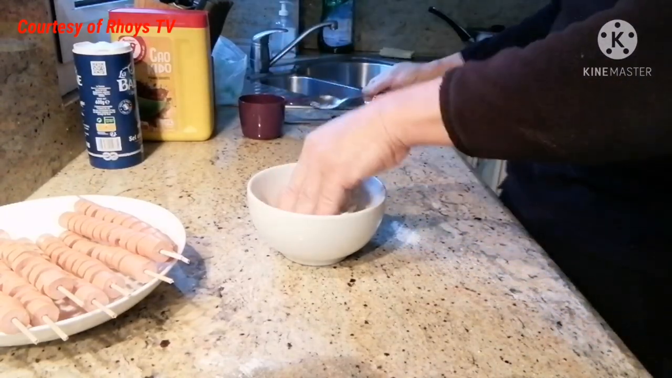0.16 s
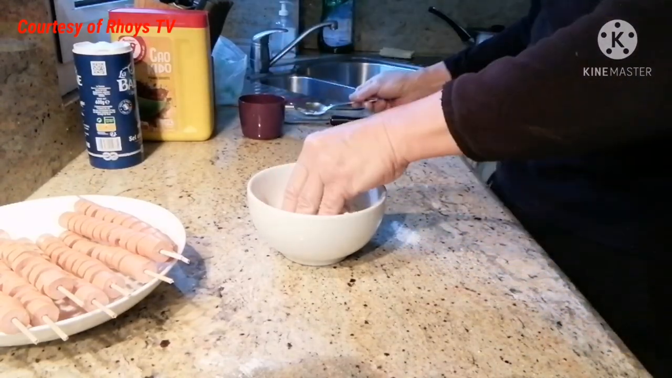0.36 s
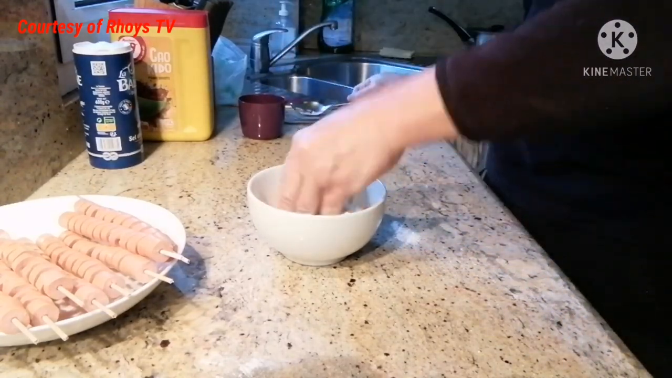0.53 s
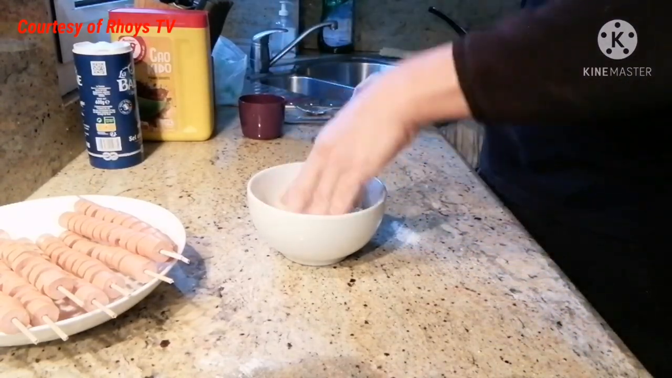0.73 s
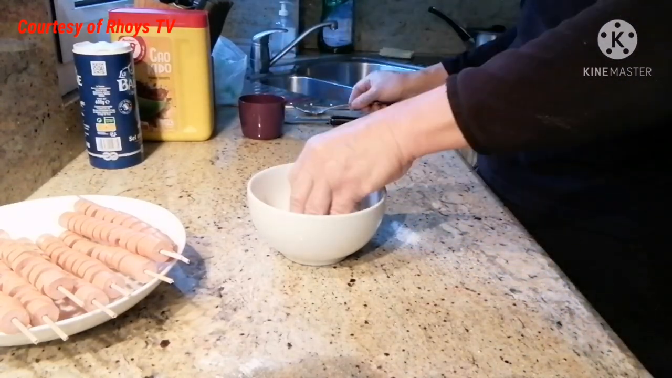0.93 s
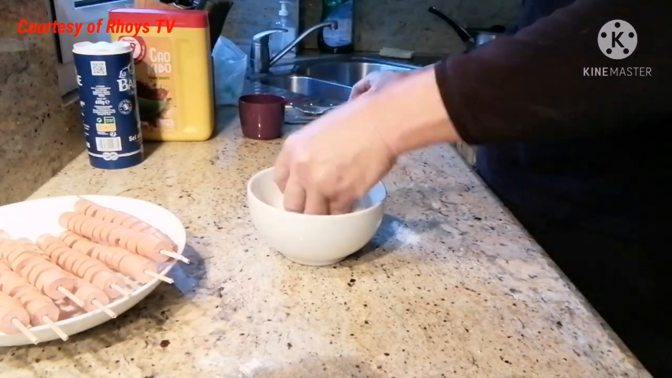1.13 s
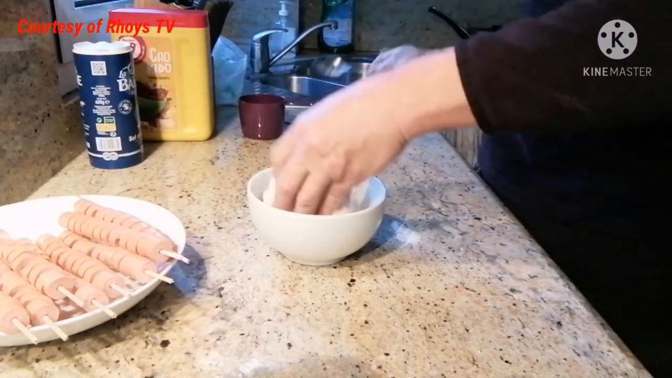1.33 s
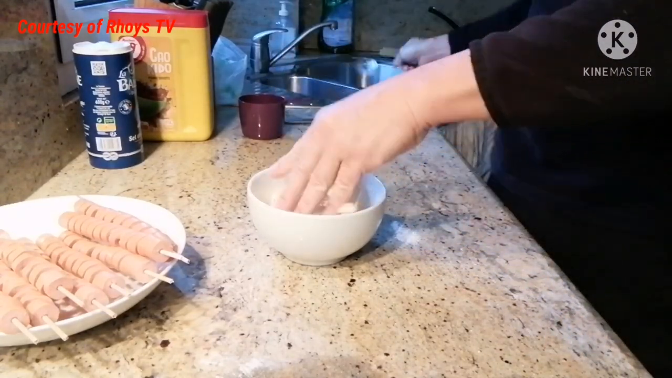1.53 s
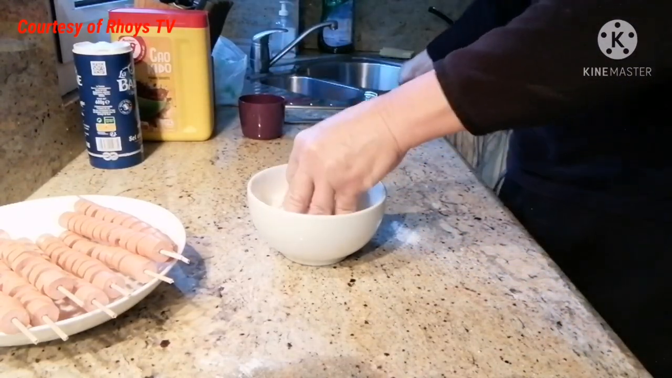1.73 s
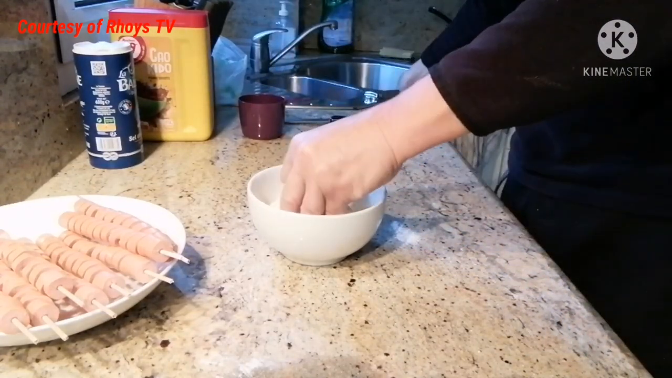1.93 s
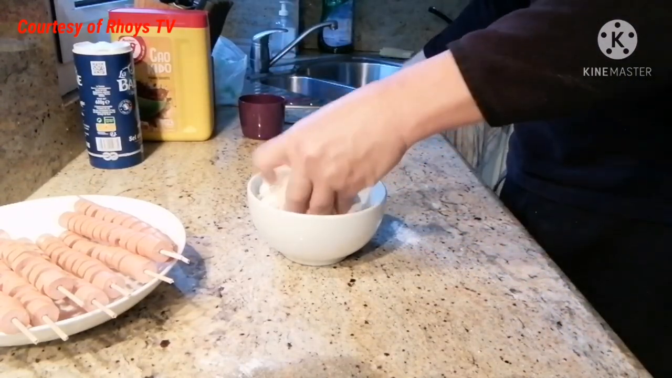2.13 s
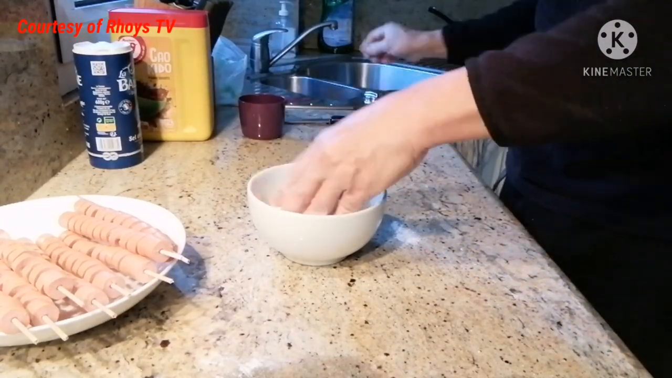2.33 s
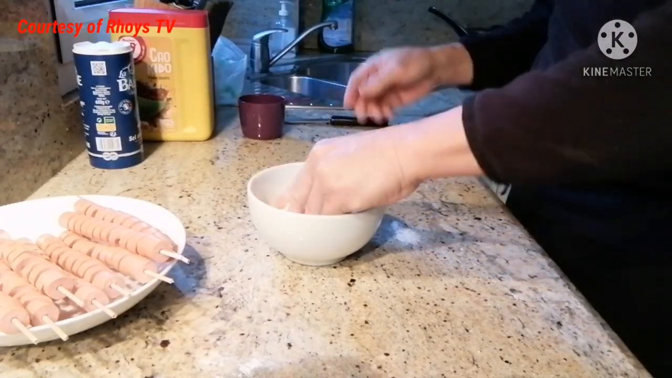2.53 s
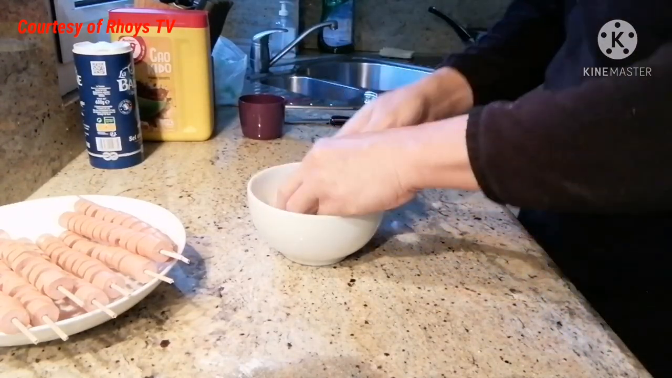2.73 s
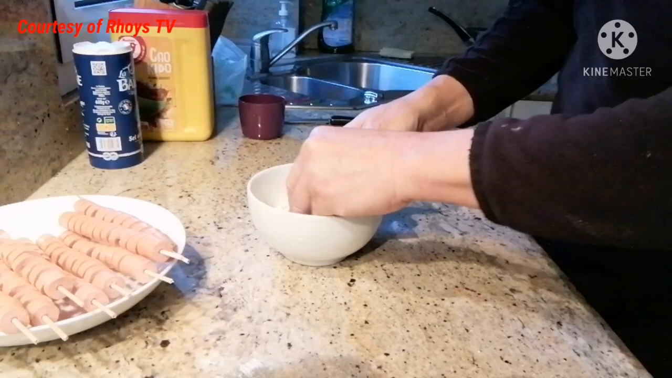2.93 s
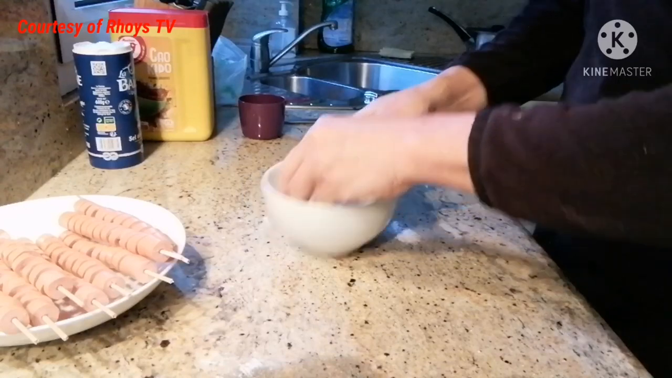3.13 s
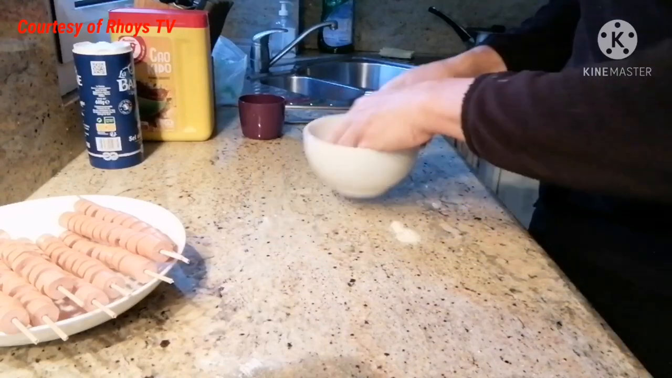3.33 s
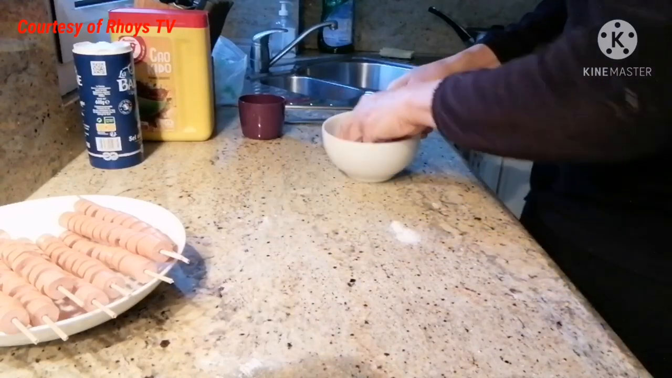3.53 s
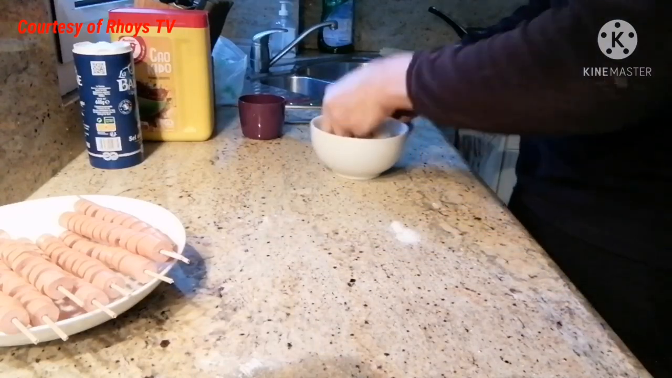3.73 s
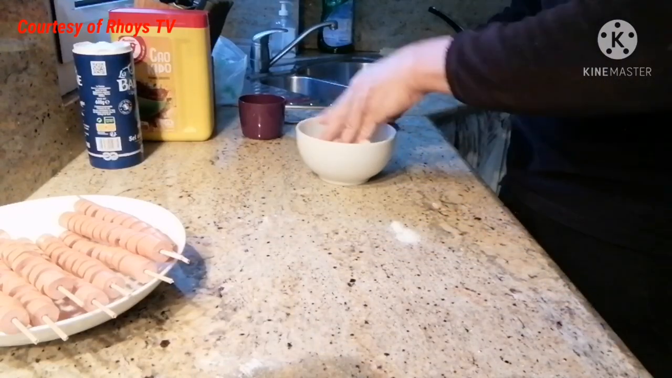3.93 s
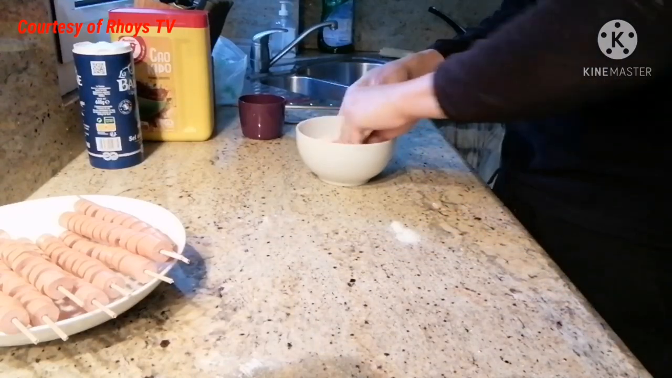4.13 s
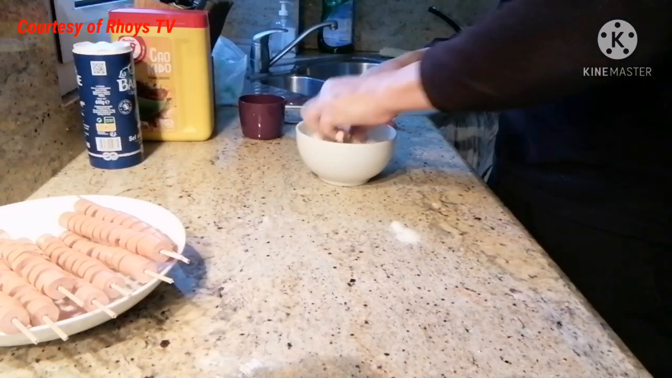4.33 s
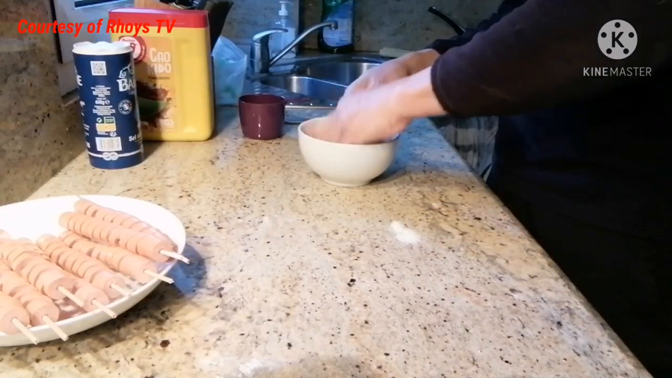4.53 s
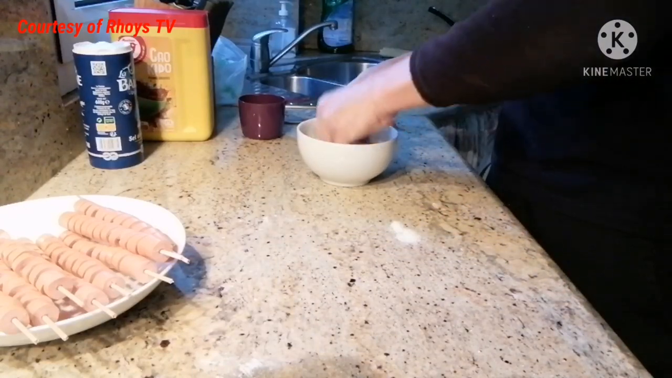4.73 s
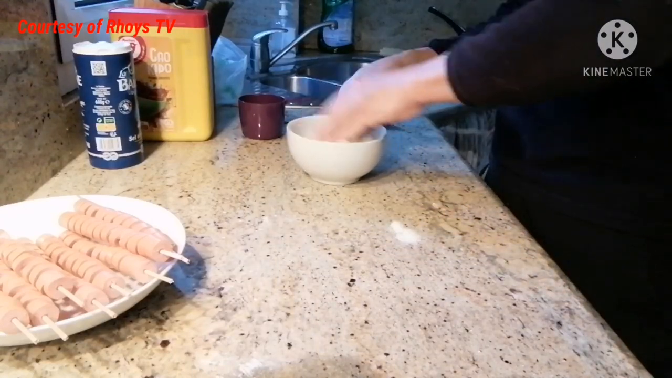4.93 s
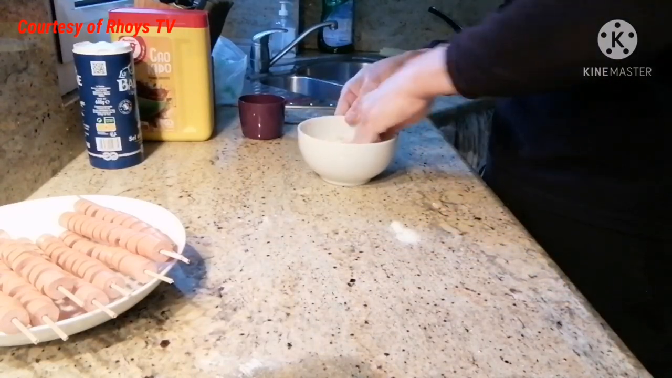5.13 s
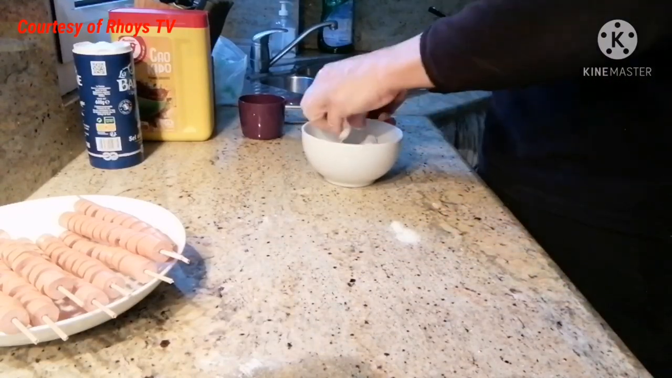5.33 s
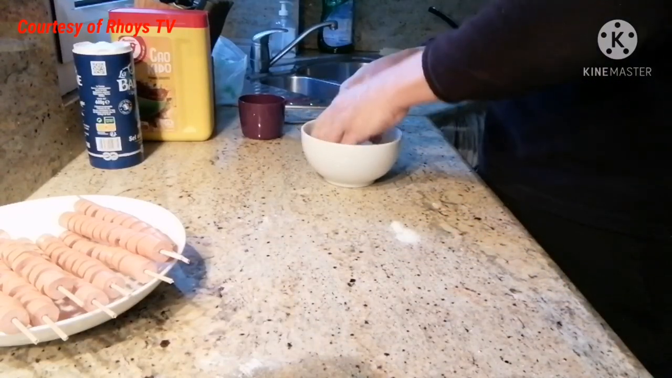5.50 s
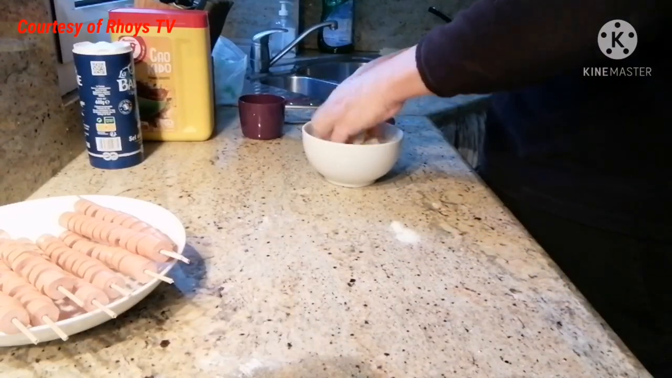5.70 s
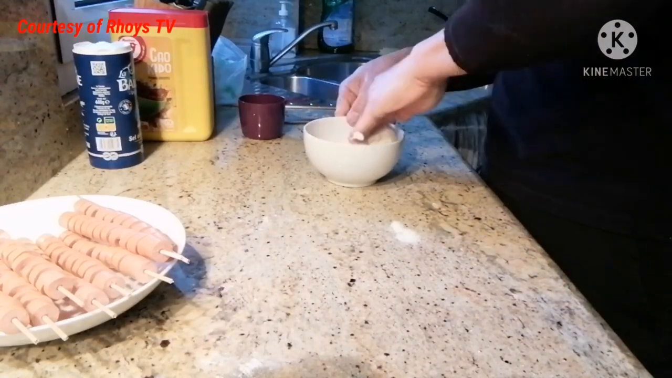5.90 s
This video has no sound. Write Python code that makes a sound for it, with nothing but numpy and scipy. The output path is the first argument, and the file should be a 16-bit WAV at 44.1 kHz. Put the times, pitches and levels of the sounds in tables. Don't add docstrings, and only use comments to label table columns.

```python
import sys
import numpy as np
from scipy import signal
from scipy.fft import rfft, irfft
from scipy.io import wavfile
from scipy.ndimage import uniform_filter1d

SR = 44100
rng = np.random.default_rng(int(sys.argv[2]) if len(sys.argv) > 2 else 0)


def amplitude_ratio(level_db):
    exponent = np.asarray(level_db, float) / 20
    return 10 ** exponent


def bounce(signal):
    frames = np.transpose(np.atleast_2d(signal))
    limited = np.clip(frames, -1, 1)
    pcm = np.round(limited * 32767).astype(np.int16)
    wavfile.write(sys.argv[1], SR, pcm)


N = 262836
T = np.arange(N) / SR


def evened(x):
    return x / np.sqrt(np.mean(x ** 2) + 1e-20)


def read(points, hz, column=1):
    table = np.transpose(points)
    return np.interp(np.log(hz + 1), np.log(table[0] + 1), table[column])


def curve(rows, column=1):
    table = np.transpose(rows)
    return np.interp(T, table[0], table[column])


def add(mix, s, sound):
    part = mix[round(s * SR):][:len(sound)]
    part += sound[:len(part)]


def coloured(points, size):
    hz = np.fft.rfftfreq(size, 1 / SR)
    return evened(irfft(rfft(rng.standard_normal(size)) * amplitude_ratio(read(points, hz)), size))


def onset(t, rise_s):
    return 1 - np.exp(-t / rise_s)


def ring(modes, scatter, rise_s):
    hz, db, t60 = np.transpose(modes)[:, :, None]
    t = np.arange(round(t60.max() * SR)) / SR
    luck = scatter * rng.standard_normal((len(modes), 2))
    level = amplitude_ratio(db + 4 * luck[:, :1] - 60 * t / t60)
    sines = level * np.sin(2 * np.pi * hz * t + luck[:, 1:])
    return sines.sum(0) * onset(t, rise_s)


def band(x, hz, width):
    return signal.lfilter(*signal.iirpeak(hz, hz / width, SR), x)


# (frequency [Hz], correlation)
LIKENESS = [(60, 0.95), (180, 0.94), (550, 0.17), (1650, -0.068), (4970, -0.052), (15000, 0.0022)]


def paired(a, b, likeness):
    return np.array([a, likeness * a + np.sqrt(1 - likeness ** 2) * b])


# (frequency [Hz], density [dB per Hz])
HISS = [(30, -26), (60, -39), (85, -7), (130, -11), (250, -18.5), (430, -15), (550, -20), (800, -12),
        (1100, -22), (1500, -21.5), (2000, -18.5), (3300, -26.5), (7000, -27.5), (16000, -47)]
# (frequency [Hz], width [Hz], level [dB])
CABINET = [(102.5, 5, -74.5), (136.9, 17.5, -74), (629.2, 15, -71.5), (692.2, 13, -69.5), (861.7, 39, -70),
           (1919, 160, -72), (2472, 210, -71), (5260, 440, -77), (6880, 1300, -71)]
# (time [s], whine level [dB])
WHINE = [(0, -82), (2, -74.5), (2.5, -75.5), (3.1, -69.5), (3.6, -76.5), (3.9, -80), (5.96, -78.5)]


def fridge():
    hiss_db, hum_db, whine_hz, mains_hz = -58.5, -61, 1766, 49.7
    pair = np.array([amplitude_ratio(hiss_db) * coloured(HISS, N) for _ in "LR"])
    for hz, width, db in CABINET:
        panel = band(band(rng.standard_normal((2, N)), hz, width), hz, width)
        pair += amplitude_ratio(db) * evened(panel)
    likeness = np.clip(read(LIKENESS, np.fft.rfftfreq(N, 1 / SR)), -1, 1)
    pair = irfft(paired(*rfft(pair), likeness), N)
    flicker = amplitude_ratio(0.75 * evened(uniform_filter1d(rng.standard_normal(N), 2500)))
    waver = amplitude_ratio(1.2 * evened(band(rng.standard_normal(N), 5, 8)))
    whine = amplitude_ratio(curve(WHINE) + 9.5) * waver * np.sin(2 * np.pi * whine_hz * T)
    wobble = evened(band(band(rng.standard_normal(N), 49.5, 8), 49.5, 8))
    hum = amplitude_ratio(hum_db) * evened(np.sin(2 * np.pi * mains_hz * T) + 0.067 * wobble)
    return pair * flicker + whine, hum


# (frequency [Hz], density [dB per Hz])
RATTLE = [(100, -55), (200, -23), (400, -2), (520, -22.5), (900, -15), (1500, -20), (2050, -19),
          (2800, -17), (5500, -17), (7200, -13), (10000, -20.5), (16500, -28.5)]
# (time [s], rattle [dB], basin boom [dB], basin pitch [Hz], brightness [dB/octave])
CLATTER = [
    (2.081, -27.5, -33, 348, 2.5),
    (2.124, -39, -37, 287, -3.5),
    (2.241, -42.5, -42, 346, -0.5),
    (2.273, -24.5, -51, 412, -0.5),
    (2.325, -25, -35, 387, 1),
    (2.339, -55, -32.5, 294.5, -8),
    (2.388, -29.5, -32, 408, 0.5),
    (2.435, -35.5, -39.5, 396, 0),
    (2.448, -51, -38.5, 300, 2),
]
# (frequency [Hz], level [dB], t60 [s])
PAN = [(1093, -7, 0.17), (1480, -10.5, 0.25), (6000, 3.5, 0.11)]
PLATE = [(190, -14, 0.24), (597, -11, 0.27), (914, -9, 0.092), (1307, -10, 0.31), (2920, -22, 0.32),
         (5280, -7.5, 0.05), (6420, 3.5, 0.03)]
SPOONS = [(1740, -8, 0.062), (1950, -14, 0.11), (4460, 3, 0.046), (7359, -2, 0.14), (8530, -12, 0.31)]
GLASS = [(1005, 0, 1.2), (2153, -5, .45)]
DRIP = [(2950, -10.5, .1), (5100, -9, 0.089), (7800, -7.5, 0.092)]
# (time [s], level [dB], modes of the object)
STRIKES = [
    (2.084, -39, PAN),
    (2.13, -48.5, [(864, -1.5, 0.23)]),
    (2.276, -23, PLATE),
    (2.329, -28, SPOONS),
    (2.425, -48.5, GLASS),
    (.845, -51.5, DRIP),
    (2.92, -50.5, DRIP),
    (4.24, -58, DRIP),
    (5.411, -54, [(1630, -6, 0.13)]),
]


def sink():
    rattle_t60, basin_t60 = 0.096, 0.11
    # (times pitch, dB, times t60)
    basin_modes = np.array([(1, 3.5, 0.88), (1.1, -6, 0.75), (0.792, -5.5, 1.35), (0.546, -8, 1.95)])
    out, booms, t = np.zeros(N), np.zeros(N), np.arange(16384) / SR
    for s, db, boom_db, hz, bright_db in CLATTER:
        colour = [(f, level + bright_db * np.log2(f / 3000)) for f, level in RATTLE]
        contacts = amplitude_ratio(3.5 * evened(uniform_filter1d(rng.standard_normal(len(t)), 70)))
        rattle = evened(contacts * coloured(colour, len(t)))
        add(out, s, amplitude_ratio(db - 60 * t / rattle_t60) * rattle * onset(t, 0.00033))
        basin = basin_modes * [hz, 1, basin_t60]
        add(booms, s, amplitude_ratio(boom_db) * ring(basin, 0.38, 0.0024))
    for s, db, modes in STRIKES:
        twins = [(hz * 1.015, level - 9, t60 * .4) for hz, level, t60 in modes]
        add(booms, s, amplitude_ratio(db) * ring(modes + twins, .1, .002))
    return out, booms


# (frequency [Hz], width [Hz])
SHADOWS = [(2060, 69), (3800, 220), (4800, 130)]


def shadowed(x):
    for hz, width in SHADOWS:
        x = x - 0.38 * band(x, hz, width)
    return x


# (time [s], level [dB], top frequency [Hz], t60 [s])
THUDS = [(2.083, -48, 190, .2), (2.441, -49, 190, .2), (3.632, -39, 190, .2), (3.941, -55, 130, .4),
         (4.062, -46, 120, .12), (5.004, -50, 250, .08), (5.042, -49, 650, .07), (5.111, -48, 120, .14),
         (5.171, -58, 95, .25), (4.606, -51, 190, .1), (5.528, -50, 190, .13)]
# (time [s], level [dB])
TICKS = [
    (.296, -53),
    (4.064, -62),
    (5.111, -69),
    (5.415, -68),
]


def hands():
    out, t = np.zeros(N), np.arange(8192) / SR
    for s, db, hz, t60 in THUDS:
        sagging_hz = hz * (0.691 + 0.79 * np.exp(-t / 0.0086))
        push = np.sin(2 * np.pi * np.cumsum(sagging_hz) / SR)
        rumble = coloured([(30, -20), (70, -3), (hz, 0), (hz * 2.6, -14), (16000, -70)], len(t))
        add(out, s, amplitude_ratio(db - 60 * t / t60) * (push + 0.46 * rumble) * onset(t, 0.00039))
    for s, db in TICKS:
        peel = coloured([(500, -25), (5500, 0), (16000, -1.5)], len(t))
        add(out, s, amplitude_ratio(db - 60 * t / .025) * peel)
    return out


# (time [s], blow [dB], hardness [dB], mode nearest the contact [Hz], rim ping [dB])
KNOCKS = [(0.268, -46, -19, 1150, -9), (0.307, -57.5, -10, 1090, -8), (3.6318, -18.5, 2, 2000, 6),
          (3.646, -24, -10.5, 930, -15), (3.7826, -26.5, 0, 1690, -2.5), (3.8, -44, -1.5, 1000, -11.5),
          (4.063, -54.5, -9, 1090, 0), (4.605, -26.5, -5, 1410, 5), (4.617, -27, -4, 1370, -16),
          (4.688, -33.5, -14, 1070, -16), (4.693, -33, 6, 1570, 5), (4.705, -28.5, 1, 1620, -7),
          (4.988, -42, -10, 1075, 1), (5.003, -36.5, 1, 936, 10.5), (5.021, -32, -14, 950, -8),
          (5.041, -38.5, -1, 970, 3.5), (5.527, -24.5, -4, 1250, -29), (5.535, -28, -3, 1690, -23)]
# (frequency [Hz], level [dB], t60 [s])
BOWL = [(468, -39, 0.29), (715, -15, 0.13), (938, -8, .1), (983.4, -10.5, 0.14), (1067, 3.5, 0.068),
        (1200, -26, 0.047), (1250, -12.5, 0.12), (1444, -15, 0.12), (1592, -6, 0.031), (1690, -4, 0.024),
        (1948, -12, 0.056), (2230, -15.5, .1), (2314, -10.5, 0.03), (2460, -9, 0.041),
        (2740, -25, 0.066), (3270, -33, 0.041), (4500, -43, .025), (5140, -26, 0.037), (6100, -27, .05),
       (7010, -22.5, 0.086), (9010, -53.5, .06), (10270, -34, 0.044), (10650, -36, .062),
       (10700, -28.5, 0.087), (13100, -35, .045), (15150, -65.5, 0.058)]
# (frequency [Hz], density [dB per Hz])
CRACK = [(100, -26), (300, -8.5), (500, -41.5), (1150, -1), (2690, -11), (4000, -16), (6500, -25.5),
         (9000, -35.5), (16000, -34.5)]


def bowl():
    grip = 0.76
    choke_s = 0.034
    spot_db, spot_octaves = 6, 0.062
    crack_db, rebound_s, rebound_db = -1, 0.0205, -3
    out, blows, t = np.zeros(N), np.zeros(N), np.arange(2048) / SR
    hz, mode_db, t60 = np.transpose(BOWL)
    last = 0
    for s, db, hard_db, spot_hz, ping_db in KNOCKS:
        off_wobble = np.minimum(abs(np.log2(hz / 1030)), 1.6)
        share_db = np.where(hz < 6600, hard_db * off_wobble, ping_db)
        share_db += spot_db * np.exp(-(np.log2(hz / spot_hz) / spot_octaves) ** 2)
        modes = np.transpose([hz, mode_db + share_db, t60 * grip])
        knock = amplitude_ratio(db) * ring(modes, scatter=0.4, rise_s=0.00043 * amplitude_ratio(-1.1 * hard_db))
        knock = knock * amplitude_ratio(-6 * (np.arange(len(knock)) / SR / choke_s) ** 2)
        blow_db = db + crack_db + hard_db + rebound_db * (s - last < rebound_s)
        crack = amplitude_ratio(blow_db - 60 * t / 0.026) * coloured(CRACK, 2048) * onset(t, 0.00018)
        add(out, s, knock)
        add(out, s, crack)
        add(blows, s, amplitude_ratio(-1) * knock[:len(t)] * amplitude_ratio(-60 * t[:len(knock)] / .02))
        add(blows, s, amplitude_ratio(1) * crack)
        last = s
    return out, blows


# (frequency [Hz], t60 [s])
ROOM = [(125, 0.79), (500, 0.34), (750, 0.93), (1000, 0.72), (1400, 0.61), (2500, 0.6), (6000, 0.55),
        (14000, 0.34)]


def kitchen(x, early_db):
    taps = np.zeros((2, SR))
    at = np.arange(300, SR - 20, 20) + rng.integers(0, 20, (2, (SR - 301) // 20))
    np.put_along_axis(taps, at, rng.choice([-1., 1.], at.shape), 1)
    hz, t, (a, b) = signal.stft(taps, SR, nperseg=256)
    likeness = np.clip(read(LIKENESS, hz), -1, 1)[:, None]
    early = 1 + amplitude_ratio(early_db - 60 * t / 0.039)
    fading = paired(a, b, likeness) * early * amplitude_ratio(-60 * t / read(ROOM, hz)[:, None])
    tail = signal.istft(fading, SR, nperseg=256)[1]
    return signal.fftconvolve(x[None], tail / np.linalg.norm(tail[0]), axes=1)[:, :N]


def ports(x, lead_s, echo_db, reach_s, floor_hz, count=24):
    taps = np.zeros(1024)
    at = rng.uniform(0.091, 1, count) * reach_s
    taps[(at * SR).astype(int)] = rng.choice([-1., 1.], count) * amplitude_ratio(-9 * at / reach_s)
    taps = signal.lfilter(*signal.butter(1, floor_hz, "high", fs=SR), taps / np.linalg.norm(taps))
    side = amplitude_ratio(echo_db) * signal.oaconvolve(x, taps)[:N]
    return np.array([x + side, np.roll(x, round(lead_s * SR)) - side])


def ducking(x, limit_db, back_db_per_s, share, size=300):
    power_db = 10 * np.log10(abs(uniform_filter1d(x ** 2, 300)) + 1e-12)
    fall = T * back_db_per_s
    held_db = np.maximum.accumulate(power_db + fall) - fall
    over_db = np.maximum(held_db - limit_db, 0)
    return amplitude_ratio(-share * uniform_filter1d(over_db, size))


# (threshold [dB], recovery [dB/s], share)
QUICK = (-44.5, 67, 0.33)
# (threshold [dB], recovery [dB/s], share)
SLOW = (-49.5, 37, 0.28)


def scene():
    near, blows = bowl()
    soft = hands()
    far, booms = map(shadowed, sink())
    hiss, hum = fridge()
    near_room = amplitude_ratio(-4.5) * kitchen(blows + amplitude_ratio(-12) * near + amplitude_ratio(2) * soft, early_db=21)
    far_room = amplitude_ratio(-0.5) * kitchen(far + amplitude_ratio(-5) * booms, early_db=-5)
    lead_s = 0.00003
    direct = soft + ports(near, lead_s, echo_db=-1, reach_s=0.015, floor_hz=400)
    direct += ports(amplitude_ratio(-2.5) * far + booms, lead_s, echo_db=-2.5, reach_s=0.0064, floor_hz=500)
    loud = near + far
    turned_down = ducking(loud, limit_db=-27, back_db_per_s=0.5, share=0.46)
    background = hiss * ducking(loud, *QUICK) * turned_down + hum * ducking(loud, *SLOW, size=4000)
    return direct + near_room + far_room + background


# (frequency [Hz], level [dB])
MIC = [(100, 0.1), (3500, 3.5), (3680, -2), (4600, -1), (4800, 3), (7500, 2), (8200, -2.5), (13400, 1.5),
       (14400, 7), (15200, 10.5), (15500, -14), (16400, -30.5), (16700, -57)]
# (frequency [Hz], left minus right [dB])
LEAN = [(60, 3), (200, 4), (380, 3), (700, -1.5), (1290, 1.2), (2380, 0.6), (4400, 4), (8120, -2),
        (15000, 1.5)]


def roll_off(x):
    return signal.sosfilt(signal.butter(12, 16670, fs=SR, output="sos"), x)


def record(dry):
    hz = np.fft.rfftfreq(N, 1 / SR)
    colour = amplitude_ratio(read(MIC, hz) + read(LEAN, hz) * np.array([[.5], [-.5]]))
    mix = irfft(rfft(dry) * colour, N)
    return roll_off(mix)


dry = scene()
out = record(dry)
bounce(out)
```